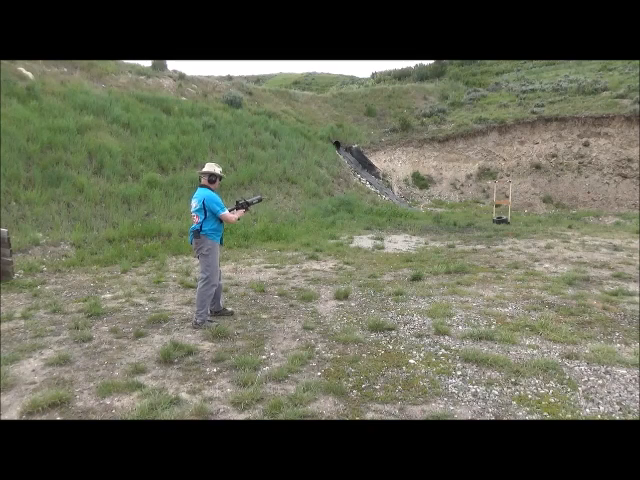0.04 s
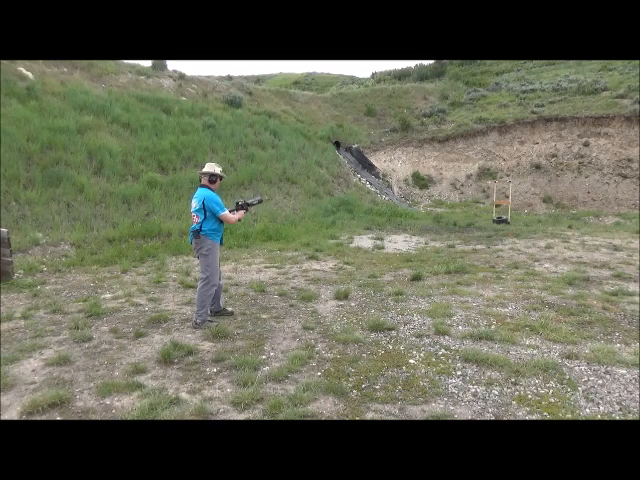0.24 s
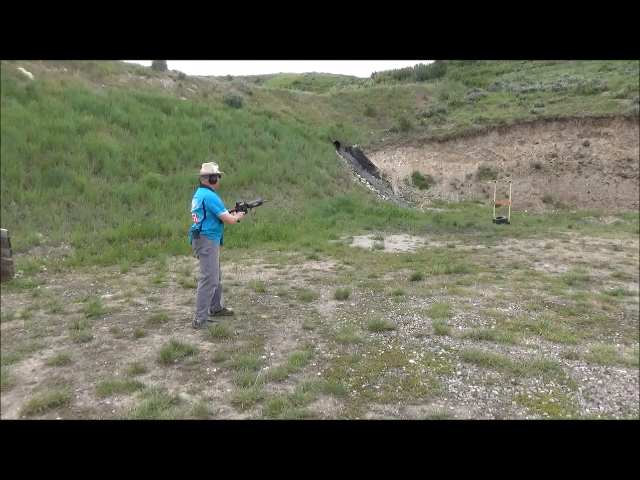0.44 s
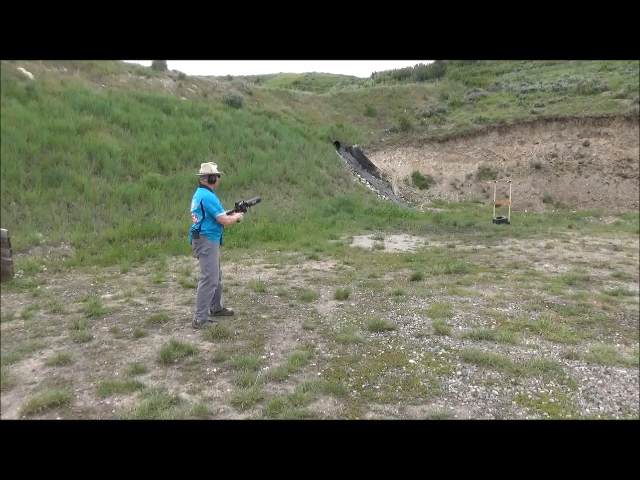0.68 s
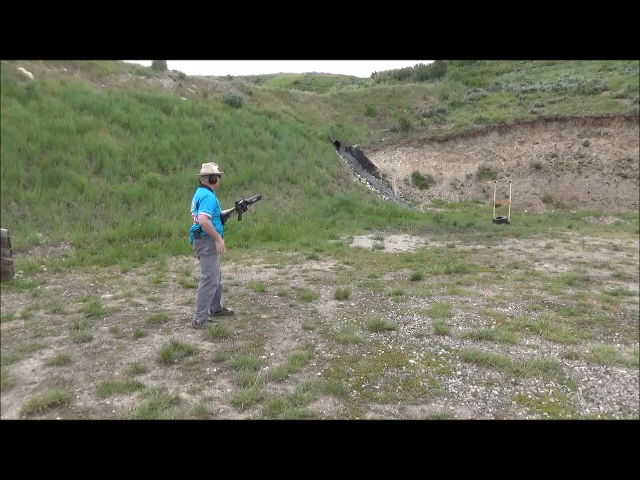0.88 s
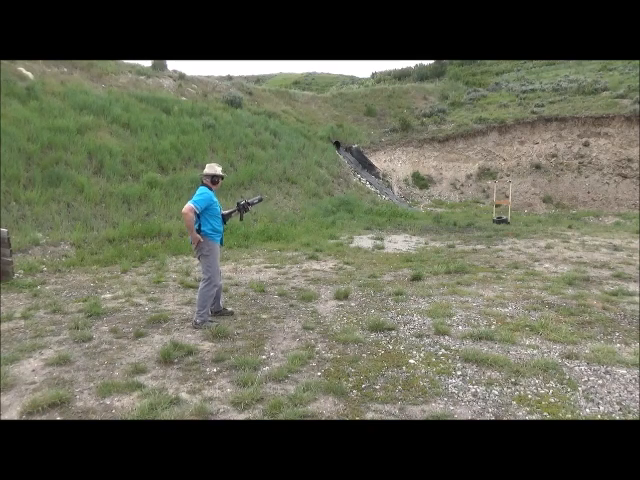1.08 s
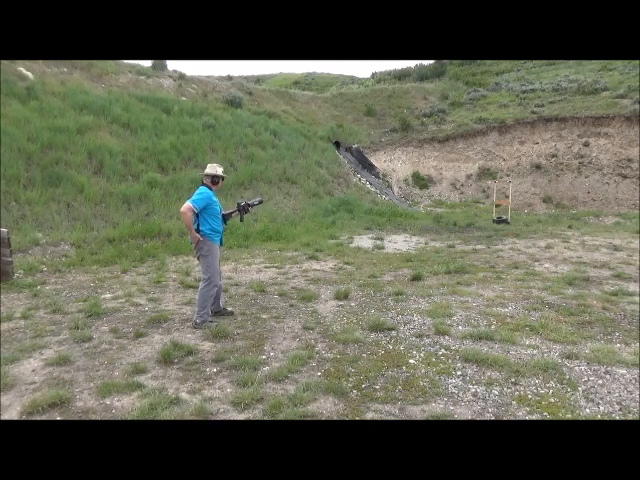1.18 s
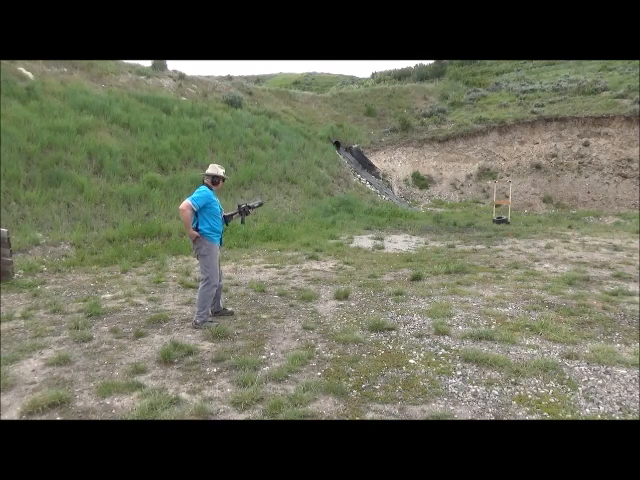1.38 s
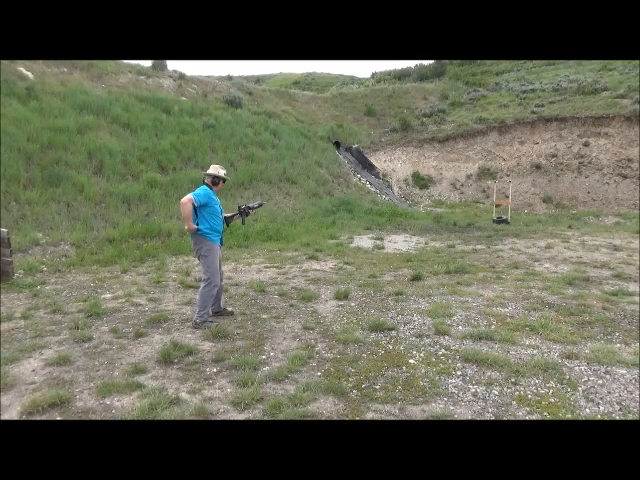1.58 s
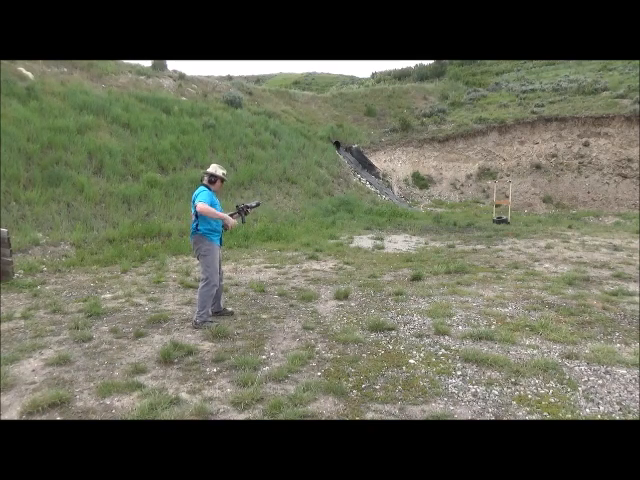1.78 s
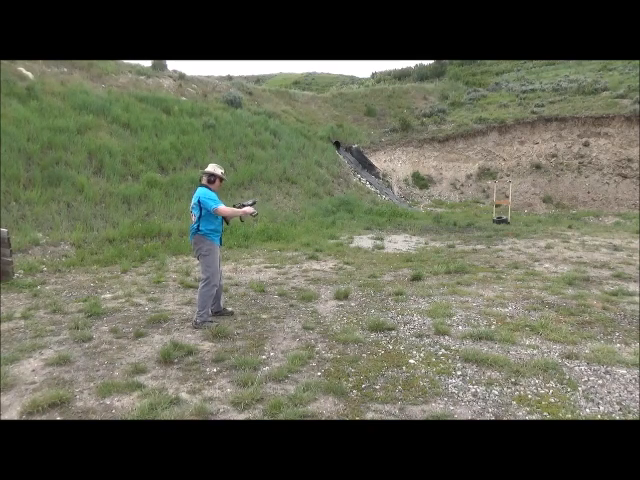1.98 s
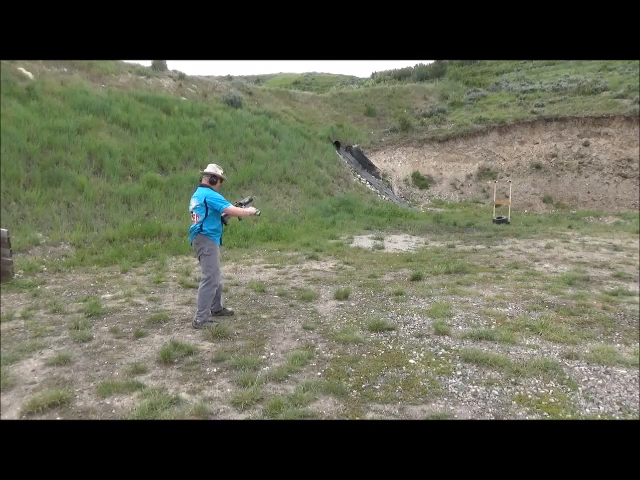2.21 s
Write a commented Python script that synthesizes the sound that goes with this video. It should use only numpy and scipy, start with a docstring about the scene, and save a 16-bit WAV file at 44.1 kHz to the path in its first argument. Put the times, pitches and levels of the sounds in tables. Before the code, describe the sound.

A launcher fires one hollow pop outdoors, with gusty wind and small birds twittering.

```python
"""An open range, where a launcher fires once: a hollow pop of pressure, a ringing tube, a faint whizz.
The ground and an earth bank scatter the bang straight back, and the hills return it as a dull roll.
Afterwards the shooter's gear rustles and ticks, and a latch rattles home. Gusts buffet the microphone
with low turbulence, and small birds twitter throughout in short, falling whistles over a hush of air."""
import sys
import numpy as np
from scipy import signal
from scipy.fft import rfft, irfft
from scipy.io import wavfile

SR = 44100
rng = np.random.default_rng(int(sys.argv[2]) if len(sys.argv) > 2 else 0)


def wrap_up_sound(samples):
    """Save the sound to the file named by the first command line argument, as 16-bit audio."""
    columns = np.atleast_2d(samples).T
    # keep every value between -1 and 1, then stretch to whole-number steps
    tamed = np.clip(columns, -1, 1)
    steps = np.round(tamed * 32767).astype(np.int16)
    wavfile.write(sys.argv[1], SR, steps)


N = 99225
T, HZ = np.arange(N) / SR, np.fft.rfftfreq(N, 1 / SR) + 1


def amp(db):
    """Decibels to gain."""
    return 10 ** (np.asarray(db) / 20)


def unit(x):
    """Scales to rms 1."""
    return x / np.sqrt(np.mean(x ** 2) + 1e-20)


def curve(points):
    """Draws an EQ curve through (Hz, value) points."""
    hz, value = np.transpose(points)
    return np.interp(np.log(HZ), np.log(hz), value)


def shaped(x, gain):
    """Filters by a gain per frequency."""
    return irfft(rfft(x) * gain, N)


def noise(gain, width=0.28):
    """Coloured stereo noise of rms 1; width is the ratio of side to mid."""
    mid, side = rng.standard_normal((2, N))
    return unit(shaped(np.array([mid + width * side, mid - width * side]), gain))


def wander(hz):
    """Random modulation of rms 1, mostly slower than hz."""
    return unit(shaped(rng.standard_normal(N), 1 / (1 + (HZ / hz) ** 4)))


def swell(start, rise, t60):
    """Straight attack, then a decay of 60 dB in t60 seconds."""
    return np.clip((T - start) / rise, 0, 1) * 1000. ** (-np.maximum(T - start - rise, 0) / t60)


def steadied(x, smooth_s=0.09):
    """Evens out the slow swings of a noise, so that an envelope rules its level."""
    power = shaped((unit(x) ** 2).mean(0), np.exp(-(HZ * smooth_s) ** 2))
    return unit(x) / np.sqrt(abs(power) + 0.15)


def ringing(modes):
    """A sine for each (Hz, dB) mode in random phase, together of rms 1."""
    return unit(sum(amp(db) * np.sin(2 * np.pi * (hz * T + rng.random())) for hz, db in modes))


def convolved(x, response):
    """Plays a mono signal through a stereo impulse response, normalised in energy."""
    return signal.fftconvolve(x[None], response / np.linalg.norm(response[0]), axes=1)[:, :N]


# The pressure pulses of the shot. Each row: peak time in seconds, level in dB, centre in Hz.
BLAST_PULSES = [(0.239, -18, 880), (0.2426, -11.5, 740), (0.2475, 0.5, 874), (0.248, -14, 405),
                (.2612, -6, 1040)]
# The tone of the bang, for its crack and reflections. Each row: frequency in Hz, relative level in dB.
BANG_EQ = [(88, -51), (150, -56), (183, -7), (319, -11.5), (368, -2), (449, -7.5), (557, -3), (1040, -4.5),
           (1890, -16), (3300, -23), (5660, -20), (11000, -36.5), (14300, -70)]
SHOT_S, TREBLE_HZ = 0.2468, 2380


def blast(pulse_cycles=0.53, low_cut_hz=130, crack_db=-24):
    """Short pressure waves make a hollow pop, with a bright crack on the strongest."""
    pulses = np.zeros(N)
    for peak, db, hz in BLAST_PULSES:
        cycles = (T - peak) * hz
        pulses += amp(db) * np.exp(-(cycles / pulse_cycles) ** 2) * np.cos(2 * np.pi * cycles + 0.13)
    pop = shaped(pulses, 1 / (1 + (low_cut_hz / HZ) ** 2))
    crack = noise(amp(curve(BANG_EQ)) / (1 + (TREBLE_HZ / HZ) ** 8), width=0.24)
    return pop + amp(crack_db) * swell(SHOT_S, rise=0.00035, t60=0.019) * crack


# Slaps off the ground, slope and earth bank. Each row: start in seconds, level in dB,
# attack and 60 dB decay in seconds, treble shelf in dB, shelf corner in Hz.
NEAR_SLAPS = [(0.247, -20.5, 0.0025, 0.41, -4.5, 2380), (0.261, -17, 0.0022, 0.61, -0.5, 2380),
              (0.298, -15, 0.014, 0.17, -28, 1140), (0.348, -23.5, 0.052, 0.32, -2.5, 6950)]


def reflections(grain_db=0.5, grain_hz=500):
    """Rough ground and banks scatter the bang into dense grainy bursts, wider in the treble."""
    width = 0.14 + 0.12 / (1 + (TREBLE_HZ / HZ) ** 4)
    colour = unit(amp(curve(BANG_EQ)))
    out = np.zeros((2, N))
    for start, db, rise, t60, shelf_db, corner_hz in NEAR_SLAPS:
        grains = unit(rng.standard_normal((2, N)) * amp(grain_db * wander(grain_hz)))
        mid, side = grains * swell(start, rise, t60)
        side = shaped(side, width)
        shelf = amp(shelf_db / (1 + (corner_hz / HZ) ** 8))
        out += amp(db) * shaped(np.array([mid + side, mid - side]), colour * shelf)
    return out


# The ring of the barrel. Each row: frequency in Hz, relative level in dB.
BARREL_MODES = [(379, -27), (560, -37), (662, -37), (872, -35), (1061, -34), (1459, -29), (2498, -37.5)]


def barrel(db=-26):
    """The tube rings briefly after the shot."""
    return amp(db) * swell(SHOT_S, rise=0.0032, t60=0.57) * ringing(BARREL_MODES)


def whizz(start_s=0.32, length_s=0.064, from_hz=14000, to_hz=8200, db=-48):
    """A thin, fuzzy whistle falls as the round flies off."""
    progress = np.clip((T - start_s) / length_s, 0, 1)
    phase = 2 * np.pi * np.cumsum(from_hz + (to_hz - from_hz) * progress) / SR
    return amp(db) * np.sin(np.pi * progress) * wander(197) * np.sin(phase)


# Echoes off the hills. Each row: start in seconds, level in dB, attack and 60 dB decay in seconds.
HILL_ECHOES = [(0.399, -32.5, 0.02, 1.82), (.66, -40.5, 0.12, 1.76), (.82, -39.5, 0.061, 0.61),
               (1.3, -47, 0.022, 0.92)]
# Their tone before filtering. Each row: frequency in Hz, relative level in dB.
HILL_EQ = [(210, -31), (350, 4.5), (514, 1), (945, -2.5), (1250, -3.5), (1780, -16.5), (2340, -12),
           (4500, -19.5), (5850, -31), (9900, -120)]


def hills(dulling_db_per_khz_s=7.5):
    """Slow echoes roll back from far slopes, duller the longer their way."""
    colour = amp(curve(HILL_EQ)) / (1 + (300 / HZ) ** 4) / (1 + (HZ / 5500) ** 4)
    out = np.zeros((2, N))
    for start, db, rise, t60 in HILL_ECHOES:
        loss_db = dulling_db_per_khz_s * HZ / 1000 * (start - HILL_ECHOES[0][0])
        out += amp(db) * swell(start, rise, t60) * noise(colour * amp(-loss_db), width=0.031)
    return out


# Deep thumps of wind. Each row: peak time in seconds, level in dB, half length in seconds, swing in Hz.
WIND_THUMPS = [(.487, -23, 0.0039, 230.5), (0.506, -13, 0.013, 142), (0.607, -18.5, 0.018, 151),
               (0.856, -23, 0.0043, 89), (0.885, -13.5, 0.0077, 159), (0.917, -21, 0.012, 113),
               (.946, -26, 0.0094, 110)]
# The tone of their turbulence before filtering. Each row: frequency in Hz, relative level in dB.
THUMP_EQ = [(25, -12), (65, 3), (156, -2.5), (241, -1.5), (420, -23), (550, -42)]


def buffets(roughness=0.57):
    """The strongest gusts shove the microphone: a few deep swings of pressure amid loose turbulence."""
    colour = amp(curve(THUMP_EQ)) / (1 + (HZ / 840) ** 6) / (1 + (32 / HZ) ** 8)
    rumble = steadied(noise(colour, width=0.088))
    out = np.zeros((2, N))
    for peak, db, half, hz in WIND_THUMPS:
        t = T - peak
        swing = np.sqrt(2) * np.cos(2 * np.pi * (hz * t + rng.random())) * np.exp(-(t / half) ** 2)
        turbulence = rumble * np.exp(-(t / (2 * half)) ** 2)
        out += amp(db) * (np.sqrt(1 - roughness ** 2) * swing + roughness * turbulence)
    return out


# The rise and fall of the gusts. Each row: time in seconds, level in dB.
GUST_LEVELS = [(0, -44.5), (.2, -53), (.25, -33.5), (.33, -39.5), (.42, -28.5), (.5, -24.5), (.6, -26.5),
               (.67, -32), (.74, -43.5), (.83, -30), (.9, -29), (1.04, -25.5), (1.12, -33), (1.28, -35),
               (1.37, -33), (1.48, -36.5), (1.54, -44.5), (1.59, -37.5), (1.83, -40.5), (1.93, -36.5),
               (2.04, -42), (2.25, -45)]
# The drift of the wind's flutter. Each row: time in seconds, centre in Hz.
FLUTTER_SWEEP = [(0, 139), (.4, 163), (.7, 127), (1.0, 166), (1.35, 222), (1.7, 147), (1.95, 150),
                 (2.2, 91)]


def wind(octaves_below=0.76, octaves_above=0.53, surge_db=2, surge_hz=31.2):
    """Low turbulence at the microphone: a flutter that drifts in pitch and swells with the gusts."""
    rumble = noise(1 / (1 + (HZ / 600) ** 4), width=0.076)
    hz, t, spectra = signal.stft(rumble, SR, nperseg=2048, noverlap=1536)
    octaves = np.log2((hz[:, None] + 1) / np.interp(t, *np.transpose(FLUTTER_SWEEP)))
    bell = (1 + (octaves / np.where(octaves < 0, octaves_below, octaves_above)) ** 2 / 6) ** -3
    flutter = signal.istft(spectra * bell, SR, nperseg=2048, noverlap=1536)[1][:, :N]
    level_db = np.interp(T, *np.transpose(GUST_LEVELS)) + surge_db * wander(surge_hz)
    return amp(level_db) * steadied(flutter)


# The hits of the latch. Each row: start in seconds, level in dB.
LATCH_HITS = [(1.4128, -37.5), (1.4174, -35.5), (1.4214, -42.5), (1.4457, -41.5)]
# The ring of the latch. Each row: frequency in Hz, relative level in dB.
LATCH_MODES = [(1430, 3), (2730, 3), (5940, -2), (6690, -3), (7960, -6)]


def latch(snap_db=2.5):
    """A latch rattles home: each contact snaps and rings the same small part."""
    out, bright = np.zeros((2, N)), 1 / (1 + (4000 / HZ) ** 2)
    for start, db in LATCH_HITS:
        ring = ringing(LATCH_MODES) * swell(start, rise=0.0005, t60=0.016)
        snap = noise(bright) * swell(start, rise=0.0005, t60=0.014)
        out += amp(db) * (ring + amp(snap_db) * snap)
    return out


# Moves of the gear. Each row: start in seconds, level in dB, attack and 60 dB decay in seconds,
# centre in Hz.
GEAR_MOVES = [(.95, -51, 0.047, 0.44, 7000), (1.016, -41.5, .007, 0.1, 6100), (1.29, -57, .08, 0.91, 7900),
              (1.42, -49, 0.02, 0.35, 5000), (1.484, -36, 0.00077, 0.0096, 9050),
              (1.803, -46.5, 0.0015, 0.03, 3400)]


def handling(spread_octaves=0.82, grain_db=1.6):
    """Handled gear gives brief, bright scrapes and clicks."""
    out = np.zeros((2, N))
    for start, db, rise, t60, hz in GEAR_MOVES:
        band = np.exp(-0.5 * (np.log2(HZ / hz) / spread_octaves) ** 2)
        out += amp(db) * swell(start, rise, t60) * noise(band, width=0.26)
    return out * amp(grain_db * wander(300))


def strap_ticks(from_s=0.77, to_s=1.5, per_second=36, centre_hz=7800, db=-28, spread_db=8):
    """Tiny dry ticks of cloth and straps while the shooter moves."""
    chance, softness = rng.random((2, N))
    triggers = (chance < per_second / SR) * (T > from_s) * (T < to_s) * amp(-spread_db * softness)
    tick = noise(np.exp(-np.log2(HZ / centre_hz) ** 2), width=0.41) * swell(0, rise=0.00045, t60=0.012)
    return amp(db) * convolved(triggers, tick)


def whistles(rows, length_s, crest, fall, trim_db=0, variety=0.74, overtone_db=-15.5):
    """Near-pure bird notes whose pitch crests early and then falls, each by its own amount."""
    out, waver = np.zeros(N), 1 + 0.0092 * wander(230)
    for start, db, hz in rows:
        at = (T >= start) & (T < start + length_s)
        progress = (T[at] - start) / length_s
        slide = fall * (1 + variety * rng.uniform(-1.03, 1))
        arch = (0.4 - crest) ** 2 - (progress - crest) ** 2  # passes the row's pitch 40% of the way in
        phase = 2 * np.pi * np.cumsum(hz * waver[at] * (1 + slide * arch)) / SR
        envelope = amp(db + trim_db) * np.sin(np.pi * progress ** 0.61) ** 1.03
        out[at] += envelope * (np.sin(phase) + amp(overtone_db) * np.sin(2 * phase))
    return out


# Bird notes: high arched chips, lower falling slurs and the faint lowest calls.
# Each row: start in seconds, level in dB before the trim, pitch in Hz.
BIRD_CHIPS = [(0.0854, -41.5, 6080), (0.12, -39, 6130), (0.1577, -36, 6250), (1.1823, -44.5, 6080),
              (1.2176, -43, 6070), (1.2524, -42, 6130), (1.6242, -42.5, 6020), (1.6583, -39.5, 6060),
              (1.6926, -41, 6140), (1.8898, -42, 6020), (1.9216, -40.5, 6140), (1.957, -40.5, 6180)]
BIRD_SLURS = [(0.0044, -40.5, 5490), (0.0542, -37.5, 5430), (0.114, -40, 5210), (0.167, -48, 5070),
              (0.2104, -40, 5620), (0.4742, -38.5, 5250), (0.5302, -41.5, 5240), (0.7731, -53, 5120),
              (0.807, -42.5, 5330), (0.8584, -43, 5340), (0.8926, -38, 5060), (0.945, -41.5, 5050),
              (1.0044, -42.5, 5190), (1.1663, -44, 5300), (1.2032, -38, 5470), (1.2564, -37.5, 5390),
              (1.3084, -38.5, 5320), (1.3284, -43, 4950), (1.351, -44.5, 5080), (1.382, -40, 5030),
              (1.401, -44, 5240), (1.4536, -40, 5090), (1.592, -41.5, 5400), (1.6446, -38.5, 5500),
              (1.693, -36.5, 5380), (1.7247, -39, 5530), (1.7844, -54, 5040), (1.8644, -43.5, 5200),
              (1.8955, -43, 5550), (1.93, -39, 5560), (1.9724, -40, 5590), (2.004, -45, 5380),
              (2.061, -49, 5260), (2.122, -40, 5680), (2.1623, -37, 5660), (2.211, -37, 5670)]
BIRD_LOW_CALLS = [(0.0797, -53, 4500), (0.133, -58, 4380), (1.8921, -57, 4300), (1.937, -57, 4460),
                  (1.987, -55, 4540), (2.0448, -60, 4510)]
FLOCK_LOW_HZ, FLOCK_SPAN_HZ = 5115, 615


def birds(wet_db=-12.5):
    """Small birds twitter near and far, with a soft scatter off the slope."""
    song = whistles(BIRD_CHIPS, length_s=0.018, crest=0.3, fall=0.19, trim_db=1.5)
    song += whistles(BIRD_SLURS, length_s=0.0248, crest=0.05, fall=0.15, trim_db=-2)
    song += whistles(BIRD_LOW_CALLS, length_s=0.028, crest=0.05, fall=0.18, trim_db=4.5)
    song += whistles(flock_notes(), length_s=0.0214, crest=0.04, fall=0.18)
    song += whistles(distant_notes(), length_s=0.0134, crest=0.043, fall=0.3)
    tail = noise(1 / (1 + (HZ / 12000) ** 2), width=0.76) * swell(0.0049, rise=0.019, t60=0.087)
    return song + amp(wet_db) * convolved(song, tail)


def flock_notes(per_note=3, window_s=0.034, under_db=13, spread_db=6):
    """The rest of the flock overlaps each chip and slur, louder where the near birds are louder."""
    lead_s, lead_db, _ = np.repeat(BIRD_CHIPS + BIRD_SLURS, per_note, axis=0).T
    delay, softness, height = rng.random((len(lead_s), 3)).T
    starts = lead_s + window_s * (delay - 0.25)
    return zip(starts, lead_db - under_db - spread_db * softness, FLOCK_LOW_HZ + FLOCK_SPAN_HZ * height)


def distant_notes(count=70, db=-54):
    """Birds further off twitter all the way through, barely above the air."""
    jitter, height = rng.random((count, 2)).T
    starts = (np.arange(count) + jitter) / count * N / SR
    return zip(starts, np.full(count, db), FLOCK_LOW_HZ + FLOCK_SPAN_HZ * height)


# The tone of the open air before its low cut. Each row: frequency in Hz, relative level in dB.
AIR_EQ = [(120, -41), (200, -3), (566, -10), (1000, -7), (1500, -8), (1650, -13.5), (2020, -13),
          (2560, -20.5), (3760, -26), (4520, -24.5), (5440, -18.5), (6650, -25.5), (11000, -27),
          (14300, -68)]


def air(db=-48.5):
    """The hush of the open range, wavering slightly in the breeze."""
    breeze = amp(0.7 * wander(12))
    return amp(db) * noise(amp(curve(AIR_EQ)) / (1 + (150 / HZ) ** 4), width=0.19) * breeze


# The stereo image of the shot and of the air. Each row: frequency in Hz, left minus right in dB.
SHOT_PAN = [(60, 1.5), (130, -0.5), (270, -1.5), (570, -5.5), (1210, -5.5), (2560, -3.5), (5430, 1.5),
            (11500, 0.0)]
AIR_PAN = [(60, 0.5), (140, -11), (350, -2), (830, -2.5), (1990, -2.5), (4790, 3), (11500, 2)]


def panned(x, pan):
    """Leans each frequency to the left or right."""
    gains = amp(np.outer([0.5, -0.5], curve(pan)))
    return shaped(x, gains / gains.mean(0))


def scene():
    """The shot and its echoes among air, wind and birds, then the shooter's gear."""
    shot = panned(blast() + barrel() + whizz() + reflections() + hills(), SHOT_PAN)
    ambience = panned(air(), AIR_PAN) + wind() + buffets() + birds()
    gear = handling() + latch() + strap_ticks()
    return shot + ambience + gear


def record(dry):
    """The recorder rounds off the highest peak, then cuts the top treble."""
    ceiling, cutoff_hz = 0.88, 11080
    rounded = dry / (1 + (dry / ceiling) ** 4) ** 0.25
    low_pass = signal.firwin(401, cutoff_hz, window=("kaiser", 8), fs=SR)
    return signal.oaconvolve(rounded, low_pass[None], "same")


dry = scene()
out = record(dry)
wrap_up_sound(out)
```